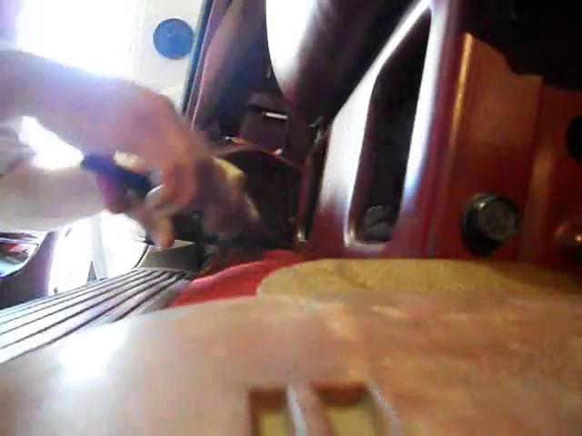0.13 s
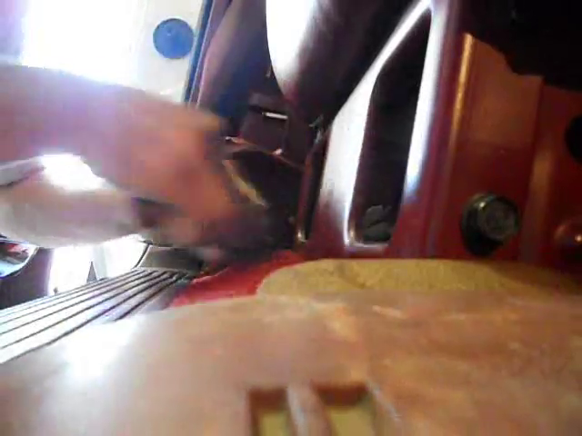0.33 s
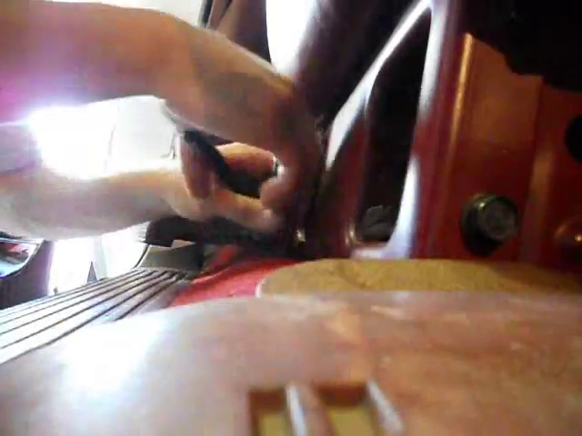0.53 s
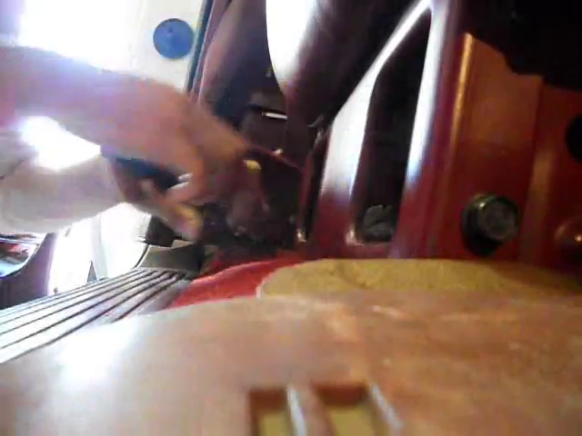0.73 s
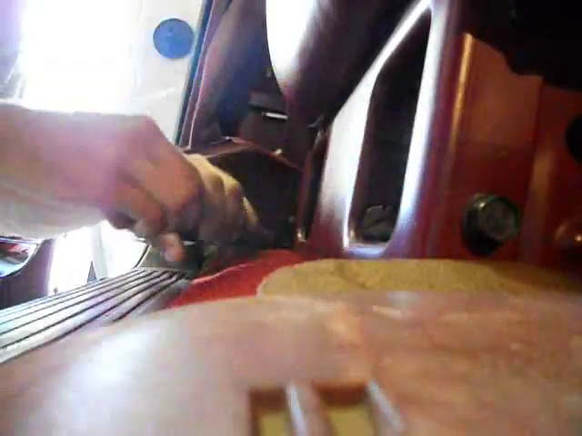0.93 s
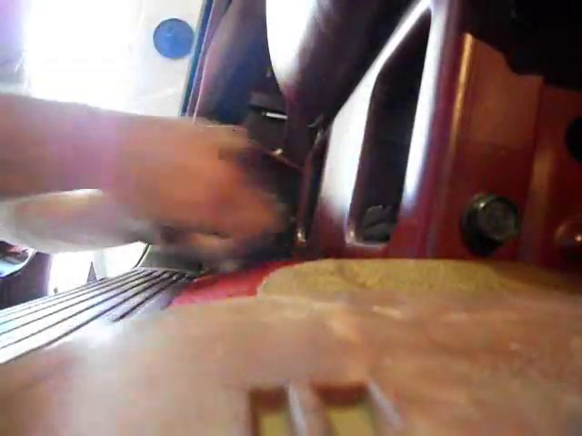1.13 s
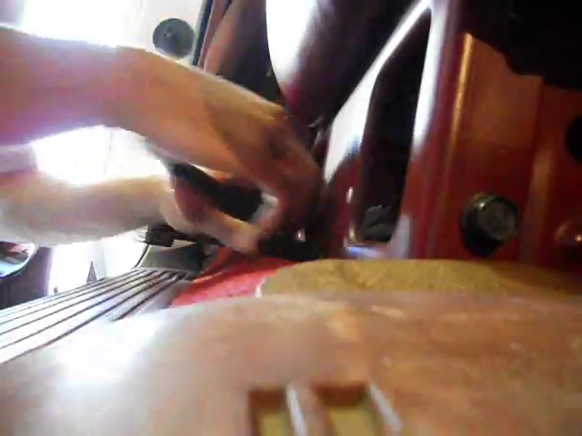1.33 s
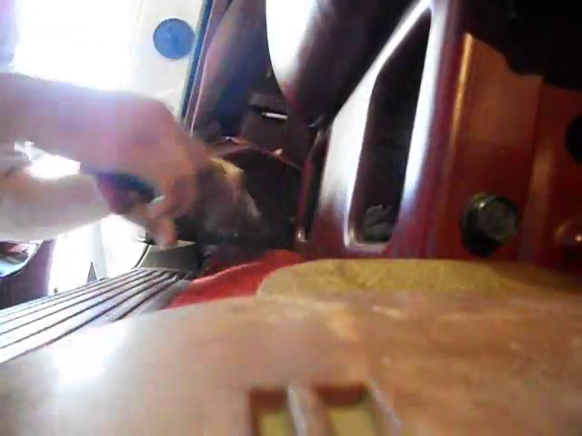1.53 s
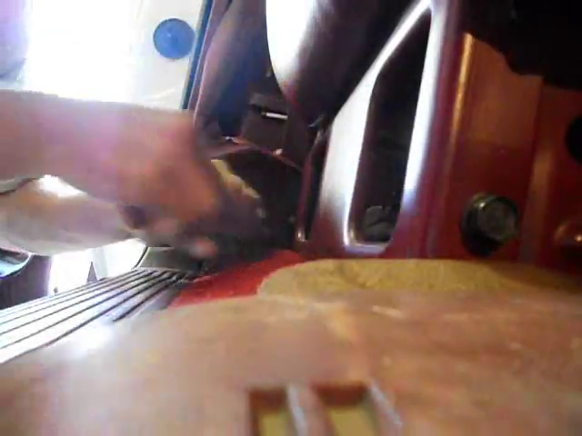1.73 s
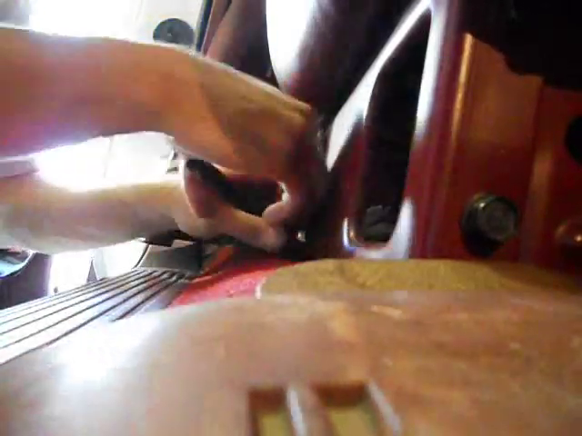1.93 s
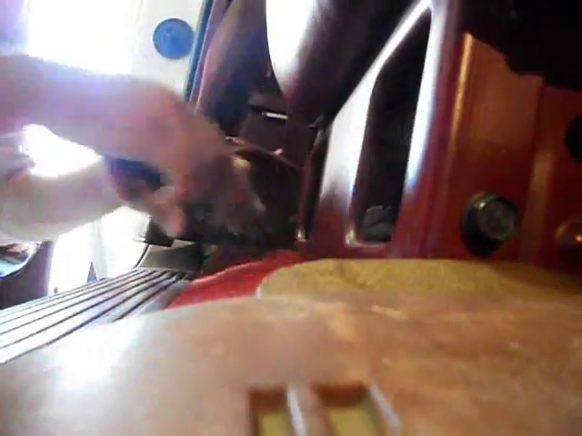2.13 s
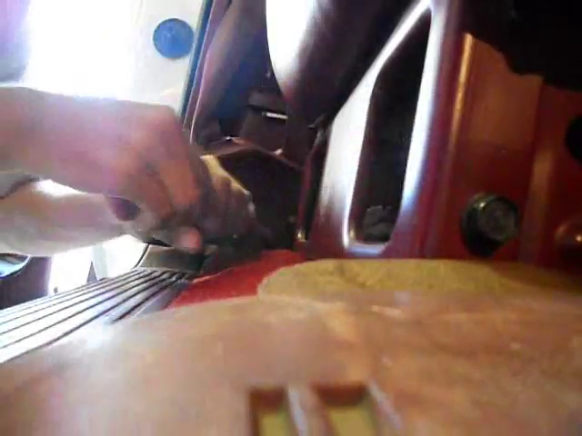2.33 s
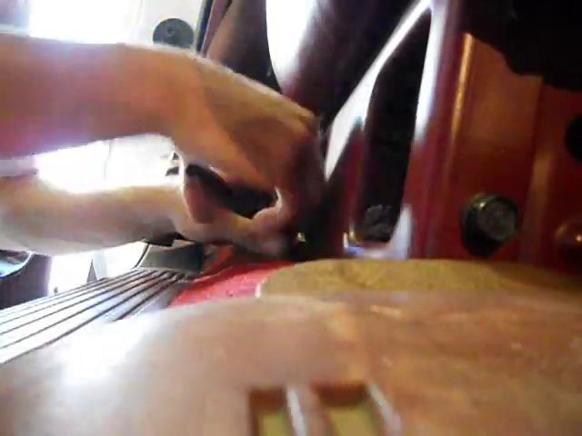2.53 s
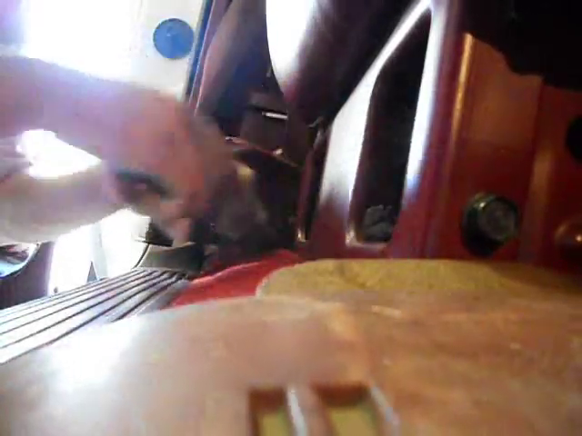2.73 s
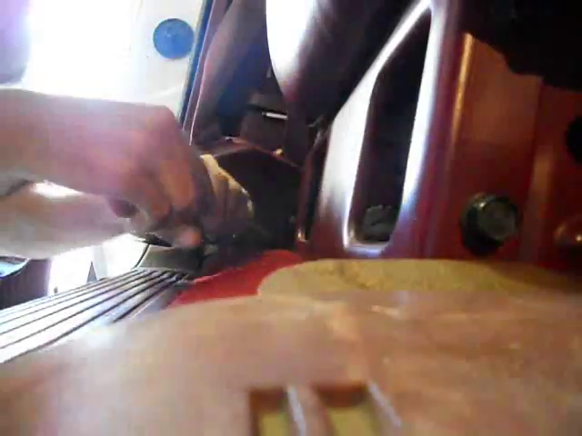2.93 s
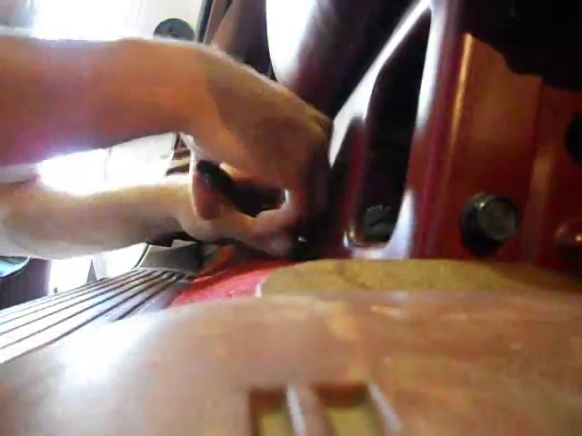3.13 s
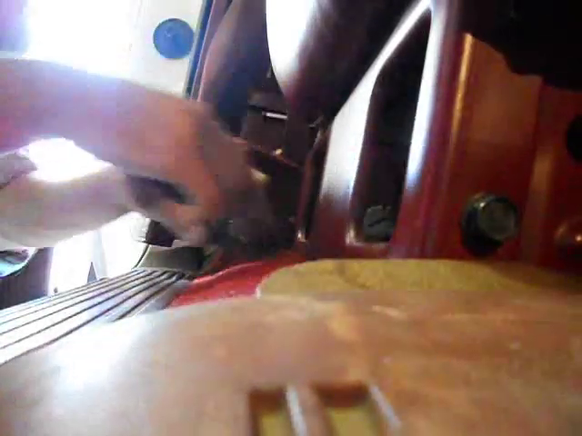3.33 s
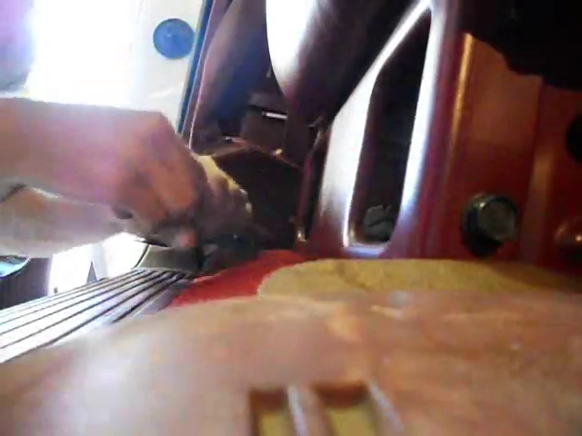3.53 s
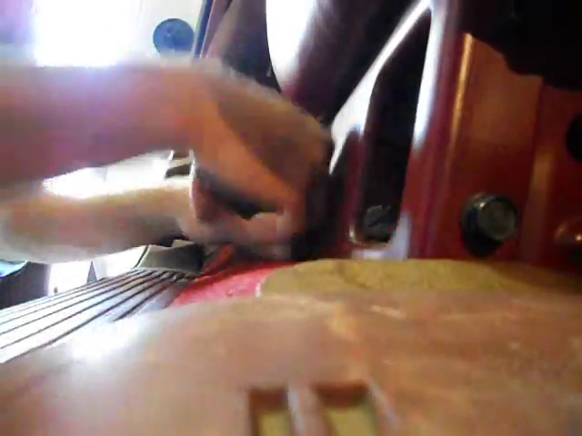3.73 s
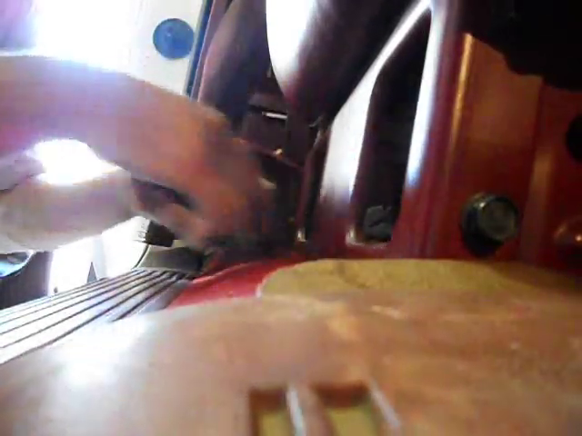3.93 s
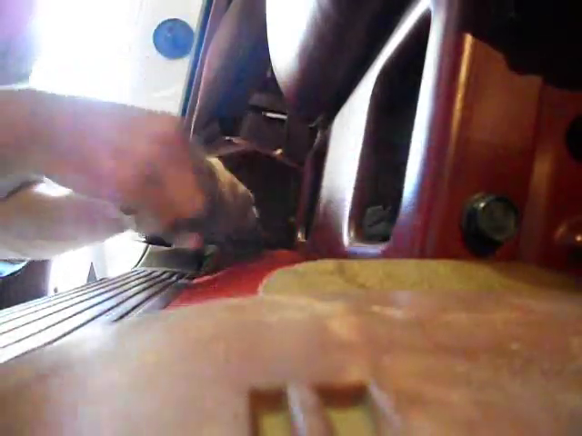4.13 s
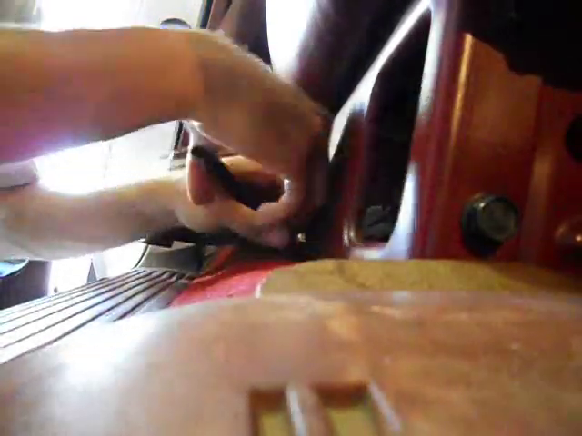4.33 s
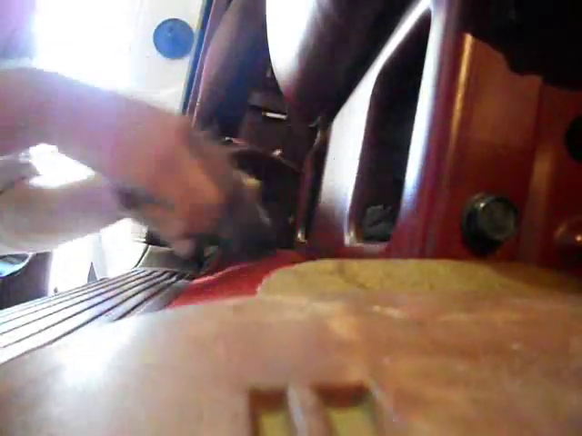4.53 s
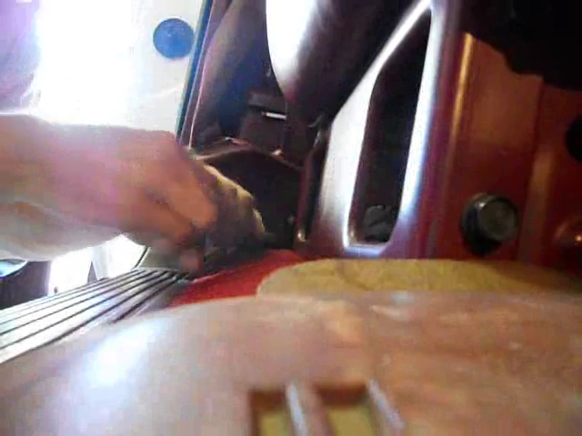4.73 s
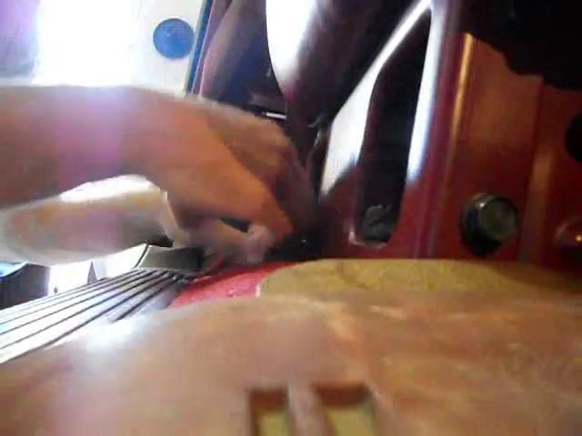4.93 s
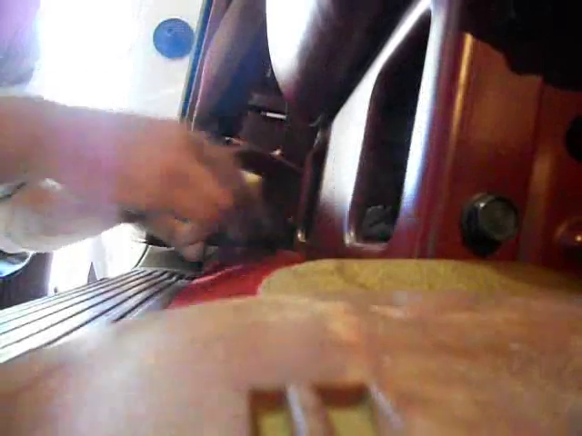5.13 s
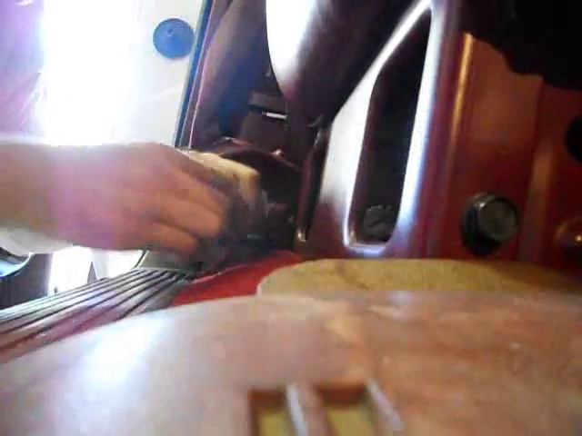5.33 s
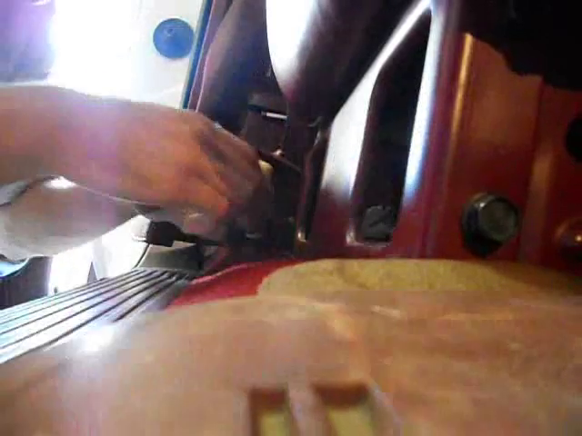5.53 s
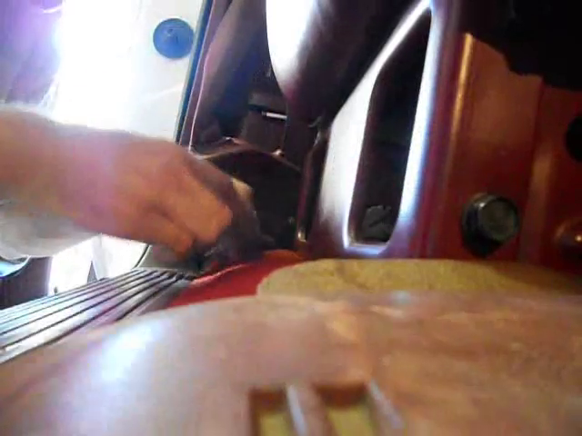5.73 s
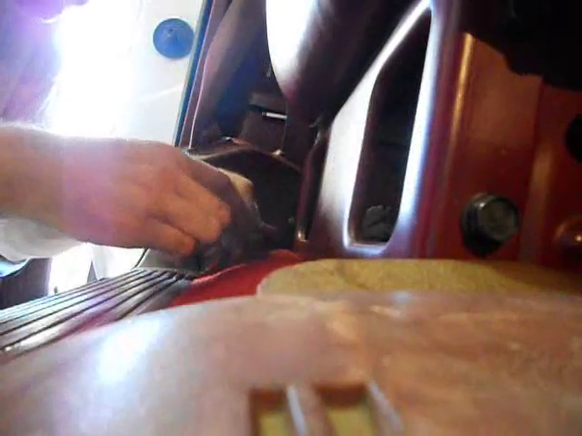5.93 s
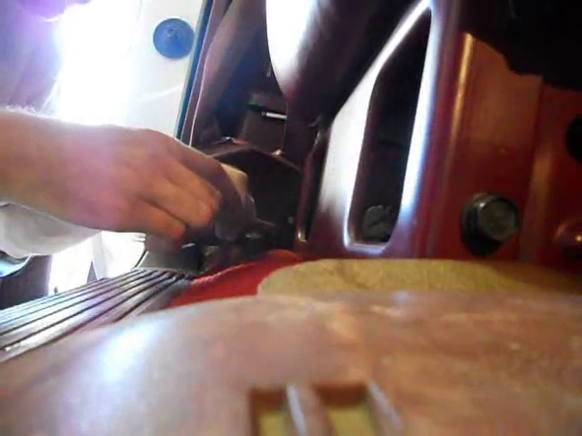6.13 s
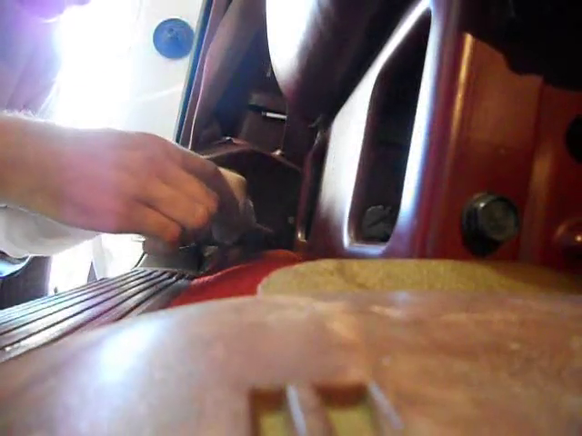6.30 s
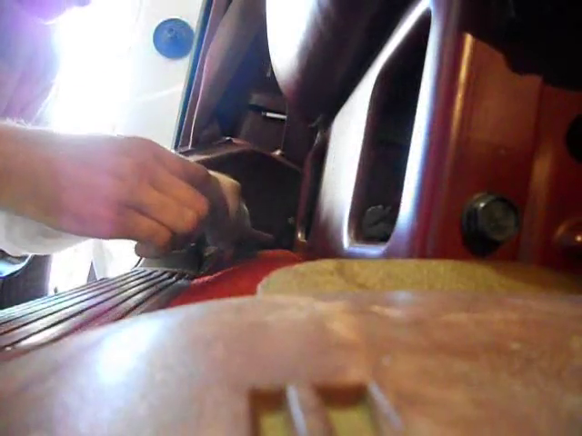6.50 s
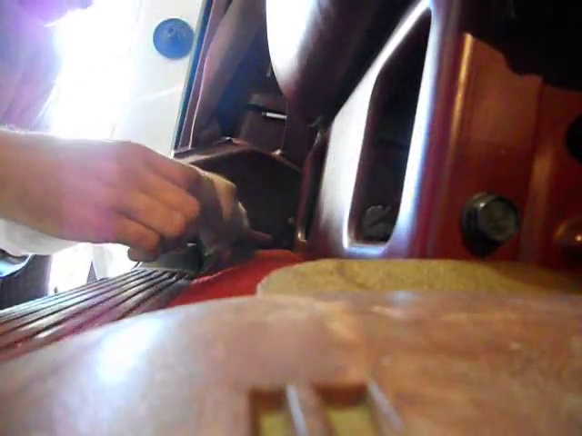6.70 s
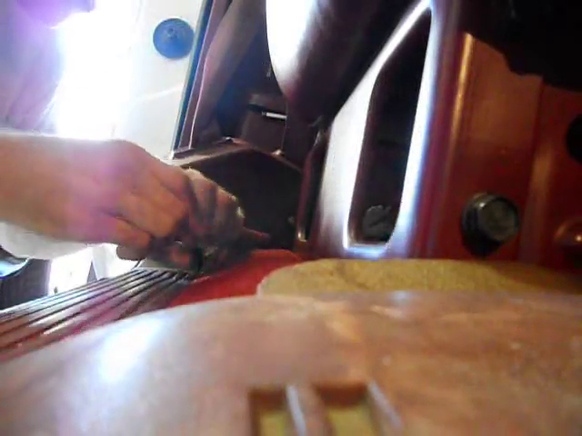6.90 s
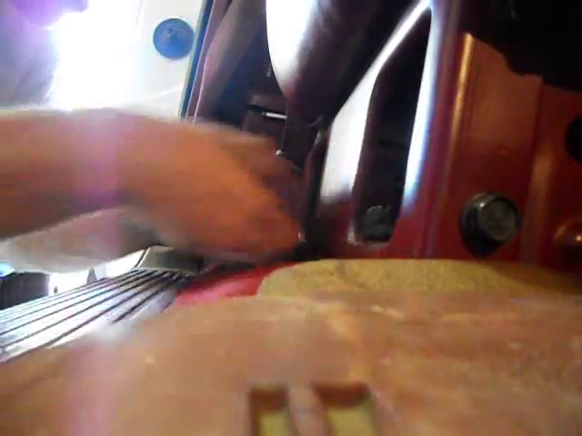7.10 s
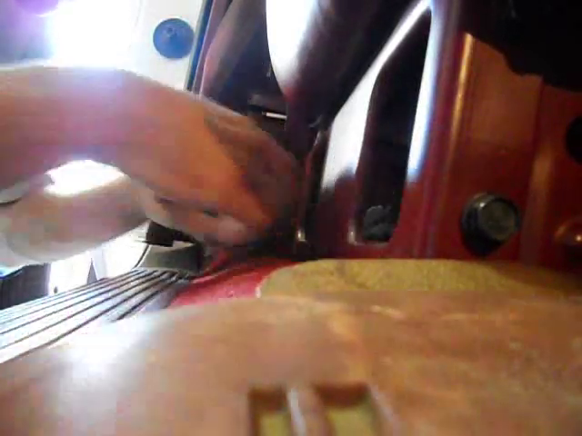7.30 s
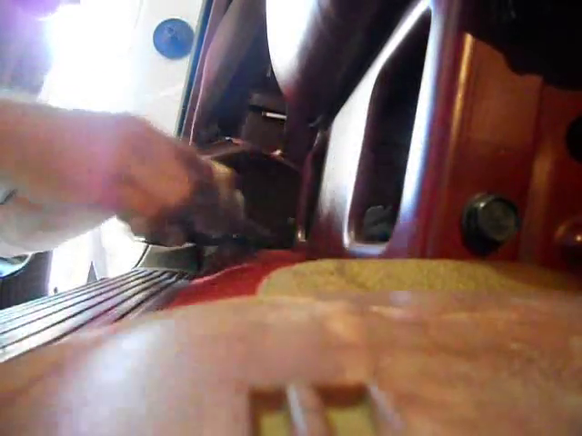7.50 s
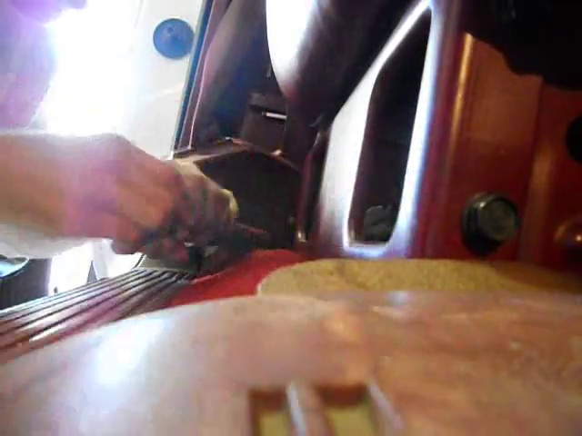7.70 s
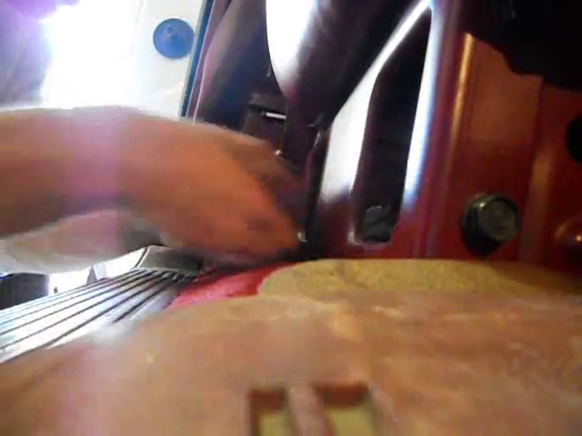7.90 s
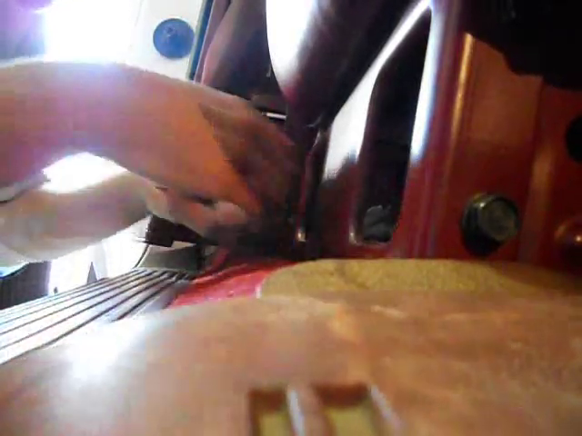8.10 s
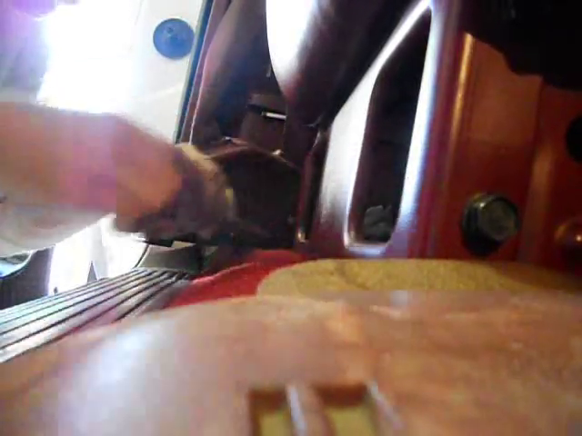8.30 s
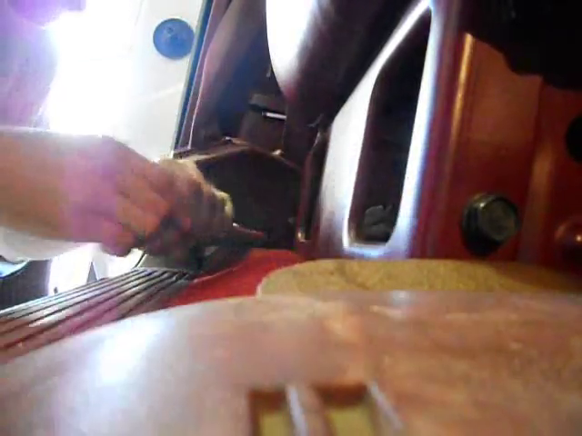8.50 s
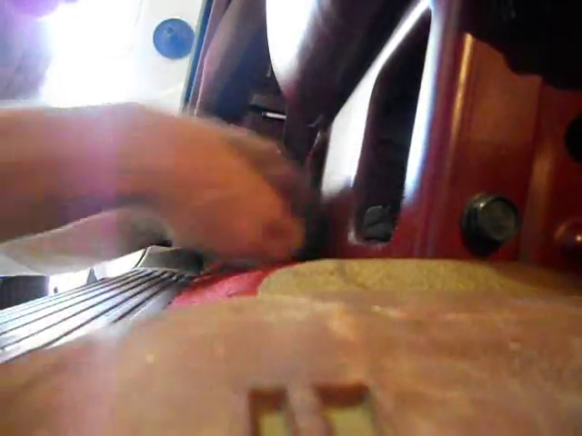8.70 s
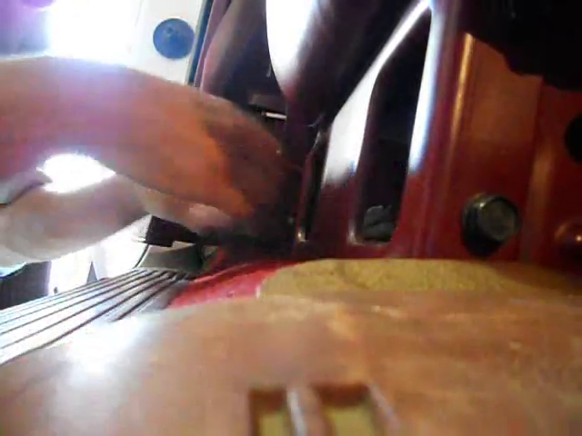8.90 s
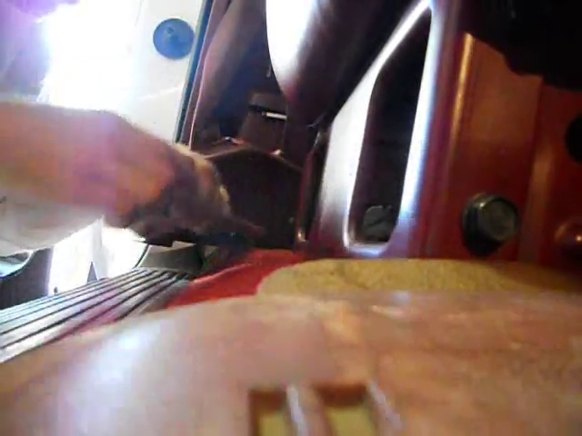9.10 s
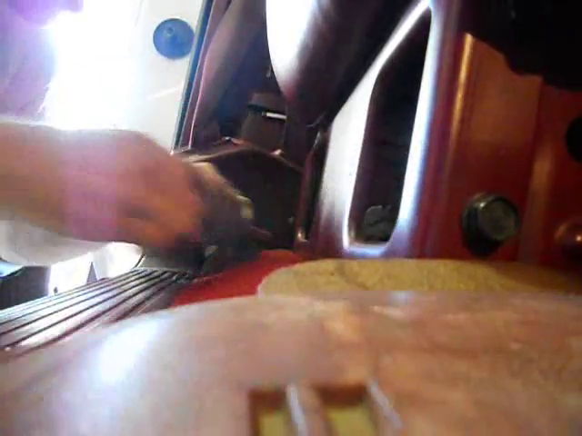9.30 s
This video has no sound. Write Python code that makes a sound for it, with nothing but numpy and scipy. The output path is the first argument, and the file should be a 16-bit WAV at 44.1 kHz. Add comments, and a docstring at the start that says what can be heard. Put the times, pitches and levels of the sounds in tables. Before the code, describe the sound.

Dry, crunchy bursts of a seized bolt turning: clustered creaky knocks, rust grit and hard steel clicks, separated by short gaps. Strokes are forceful at first, quieter and smaller around six seconds, then strong again. Brief high jaw ringing and rasping slides come in the middle, and a soft low-pitched rod tone lingers at times. Close, harsh low-grade microphone in a small cabin, with wavering hiss, faint whine and deep rumble.

```python
"""Inside a vehicle, a small camera close by: locking pliers turn a rusted bolt in short strokes, from the first moment.
In each stroke the rust grinds and the thread sticks and slips, knocking the sheet metal; the pliers clank on steel.
The jaw rings fainter at 1.4 s; a thin rod rings on at times from 1.7 s; the jaw sings in short spells from 3.4 to 4.1 s.
Scrapes come between 3.7 and 5.5 s. Under it all lie hiss, floor rumble, a thin whine and a short, dull cabin tail.
The camera samples at half rate and repeats each sample, which mirrors the treble."""
import sys
import numpy as np
from scipy import signal
from scipy.fft import rfft, irfft
from scipy.io import wavfile
from scipy.ndimage import uniform_filter1d

SR = 44100
rng = np.random.default_rng(int(sys.argv[2]) if len(sys.argv) > 2 else 0)


def wav_out(sig):
    """Save sig, one row per channel (or a flat mono array), as 16-bit PCM at SR to the path in sys.argv[1]."""
    wavfile.write(sys.argv[1], SR, np.round(np.clip(np.atleast_2d(sig).T, -1, 1) * 32767).astype(np.int16))


N = 412335  # samples


def undb(db):
    """Amplitude factor of a level in dB."""
    return 10 ** (np.asarray(db) / 20)


def unit(x):
    """Scale to an RMS of one."""
    return x / np.sqrt(np.mean(x ** 2))


def curve(table, off_db=-90):
    """Columns of a table drawn as lines over all samples; off_db outside the table's span."""
    s, *columns = np.transpose(table)
    t = np.arange(N) / SR
    return [np.interp(t, s, column, left=off_db, right=off_db) for column in columns]


def walk(rate_hz):
    """Wandering random level: held for 1 / rate_hz seconds, then slewed twice."""
    hold = int(SR / rate_hz)
    steps = np.repeat(rng.standard_normal(N // hold + 1), hold)
    return uniform_filter1d(uniform_filter1d(steps, hold), hold)[:N]


RING_T60_S, RING_SLOPE = 0.028, 0.55  # t60 at 500 Hz with damp 1, and how fast it shortens with pitch


def ring(modes, scatter_db, detune, damp=1., count=1, size=2048):
    """Responses of a set of modes; grip and contact point shift and weight them a little at every blow."""
    hz, db = np.transpose(modes)[:, :, None]
    t60_s = RING_T60_S / damp * (500 / hz) ** RING_SLOPE
    t = np.arange(size) / SR
    chance = rng.standard_normal((count, 2, len(hz), 1))
    shifted_hz = hz * (1 + detune * chance[:, 0])
    waves = np.sin(2 * np.pi * shifted_hz * t) * np.exp(-np.log(1000) * t / t60_s)
    sides = rng.choice([-1, 1], (count, len(hz), 1))  # a mode may start inward or outward
    return np.sum(undb(db + scatter_db * chance[:, 1]) * sides * waves, axis=1)


def blows(times, parts, lead_s, rise_s, last_s, shiver_db, shiver_s, grit_db, damp, scatter_db, detune,
          size=4096):
    """Each blow is a short gritty push and a faint shiver after it; parts pairs modes with a peak dB per blow."""
    t = np.arange(size) / SR
    fine = rng.standard_normal((len(times), size))
    coarse = rng.exponential(size=(len(times), size))
    grit = undb(grit_db * np.minimum(coarse, 3))
    force = grit * np.exp(-t / last_s) + undb(shiver_db) * np.exp(-t / shiver_s)
    push = fine * force * (1 - np.exp(-t / rise_s))
    out = np.zeros(N + size)
    for modes, peak_db in parts:
        responses = ring(modes, scatter_db, detune, damp, count=len(times))
        sounds = signal.fftconvolve(push, responses, axes=1)[:, :size]
        sounds *= (undb(peak_db) / np.abs(sounds).max(axis=1))[:, None]
        for start_s, sound in zip(times - lead_s, sounds):
            first = int(start_s * SR)
            out[first:first + size] += sound
    return out[:N]


# the hiss swells and sinks: time_s, level_db (before the colour and a fixed lift)
HISS_SWELL = [(0.0, -62.5), (1.69, -67.5), (2.97, -64), (3.15, -71), (3.72, -76.5), (4.17, -62.5),
              (4.63, -69.5), (6.53, -74.5), (7.06, -61.5), (8.67, -69.5), (9.35, -65)]
# colour of the hiss: pitch_hz, level_db
HISS_COLOUR = [(80, 6.5), (200, 16.5), (400, 11), (700, 8), (1200, 6), (2000, 3), (4000, 0.5), (7000, -2),
               (10500, -3)]
# low rumble through the floor: time_s, level_db
RUMBLE = [(0.0, -41.5), (1.01, -53), (1.3, -40.5), (1.51, -50), (2.91, -50), (3.67, -65), (3.77, -47),
          (4.4, -39.5), (4.69, -58), (5.6, -56), (6.28, -70.5), (7.29, -45), (8.04, -60), (8.12, -47),
          (8.59, -59), (9.35, -46.5)]
# thin whine: centre_hz, flip_hz (up and down), flip_rate_hz
WHINE = 7867, 15, 3.75


def background():
    """Coloured noise as hiss, low-band noise as rumble, and a flipping sine whine that swells with the hiss."""
    swell_db = curve(HISS_SWELL)[0]
    hz = np.fft.rfftfreq(N, 1 / SR)
    colour_hz, colour_db = np.transpose(HISS_COLOUR)
    colour = undb(np.interp(np.log(hz + 1), np.log(colour_hz), colour_db))
    hiss = irfft(rfft(rng.standard_normal(N)) * colour, N) * undb(swell_db + 18.5)

    low_band = signal.butter(2, [30, 80], "band", fs=SR, output="sos")
    rumble = unit(signal.sosfilt(low_band, rng.standard_normal(N))) * undb(curve(RUMBLE)[0])

    centre_hz, flip_hz, flip_rate_hz = WHINE
    pitch_hz = centre_hz + flip_hz * signal.square(2 * np.pi * flip_rate_hz * np.arange(N) / SR)
    whine_db = -57.0 + 1.2 * (swell_db - swell_db.mean())
    whine = undb(whine_db) * np.sin(2 * np.pi * np.cumsum(pitch_hz) / SR)
    return hiss + rumble + whine


CABIN_T60_S, CABIN_DB, CABIN_HZ = 0.15, -21.5, 1500  # decay, level of the tail, its low-pass corner


def cabin(work):
    """A short, dull tail from the cabin: the work convolved with decaying low-passed noise."""
    t = np.arange(int(.5 * SR)) / SR
    dull = signal.lfilter(*signal.butter(1, CABIN_HZ, fs=SR), rng.standard_normal(len(t)))
    tail = dull * undb(-60 * t / CABIN_T60_S)
    return undb(CABIN_DB) * signal.fftconvolve(work, tail / np.linalg.norm(tail))[:N]


# the thin rod is jolted: start_s, level_db (RMS of an undecayed tone), t60_s
ROD = [(1.66, -42.5, 0.89), (2.268, -41, 1.9), (2.872, -43, 1.9), (3.971, -43.5, 2), (4.773, -52.5, 2.1),
       (6.52, -49.5, 1.4), (6.87, -45.5, 8.7), (7.72, -43.5, 2.1), (8.419, -52, 2.1)]
ROD_HZ = 409


def rod():
    """One pure mode, set off at each jolt, swelling in over 30 ms and dying away exponentially."""
    t, out = np.arange(N) / SR, 0
    for start_s, level_db, t60_s in ROD:
        age = np.maximum(t - start_s, 0)
        level = np.sqrt(2) * undb(level_db - 60 * age / t60_s)
        out = out + level * np.minimum(age / 0.03, 1) * np.sin(2 * np.pi * ROD_HZ * age)
    return out


# jaws slide over steel, a hollow tone moving as they go (levels before the swell):
# start_s, end_s, tone_from_hz, tone_to_hz, tone_db, rasp_hz, rasp_db
SCRAPES = [(3.751, 3.787, 887, 1100, -33.5, 4440, -39), (4.103, 4.22, 1000, 1030, -66, 6630, -43),
           (5.248, 5.312, 602, 640, -26.5, 3160, -43), (5.323, 5.425, 512, 883, -27.5, 3440, -38),
           (5.416, 5.47, 877, 954, -34.5, 3520, -49), (5.453, 5.492, 893, 1010, -28.5, 3560, -35)]
# steel modes, damped fast by rust, paint and the gripping hand: pitch_hz, level_db
STEEL = [(1900, -1), (2360, 8), (2600, 0), (2990, 7), (3650, 5.5), (3960, 5), (4390, 6.5), (4800, 5),
         (5500, -3), (5950, -2.5), (6700, -3.5)]


def scrapes():
    """Rough sliding noise: a narrow gliding band and a wide rasp around a higher pitch."""
    out = np.zeros(N)
    for start_s, end_s, from_hz, to_hz, tone_db, rasp_hz, rasp_db in SCRAPES:
        size = int((end_s - start_s) * SR)
        phase = 2 * np.pi * np.cumsum(np.linspace(from_hz, to_hz, size)) / SR
        # slow noise on both quadratures makes a narrow band around the glide
        narrow = signal.lfilter(*signal.butter(3, 200, fs=SR), rng.standard_normal((2, size)))
        tone = narrow[0] * np.cos(phase) + narrow[1] * np.sin(phase)
        tone *= undb(3.3 * walk(90)[:size])

        rough = rng.standard_normal(size) * undb(4.9 * np.minimum(rng.exponential(size=size), 4))
        steel = signal.fftconvolve(rough, ring(STEEL, 1.7, 0.023)[0])[:size]
        rough = unit(rough) + undb(-7.5) * unit(steel)  # the steel rings along
        rasp_band = signal.butter(4, [.5 * rasp_hz, 1.5 * rasp_hz], "band", fs=SR, output="sos")
        rasp = signal.sosfilt(rasp_band, rough)

        swell = np.sin(np.pi * np.linspace(0, 1, size) ** 1.33) ** 0.57
        first = int(start_s * SR)
        out[first:first + size] += swell * (unit(tone) * undb(tone_db) + unit(rasp) * undb(rasp_db))
    return out


# the pliers are pulled or pushed: start_s, length_s, grinding_db, boom_db and steel_db (both against the grinding)
STROKES = [(0.0, 0.21, -32, 0, -14.5), (0.301, 0.096, -31, 2.5, -12), (0.63, 0.054, -38.5, -5, -18),
           (0.772, 0.035, -29, -9, -19), (0.893, 0.028, -43, 2, -20), (1.081, 0.21, -51, 3, -14.5),
           (1.381, 0.11, -28.5, -1, -17.5), (1.54, 0.099, -37, -2, -15.5), (1.898, 0.017, -42, -11, -27),
           (2.03, 0.16, -29.5, -0.5, -15.5), (2.652, 0.21, -29.5, -2, -17.5), (3.094, 0.052, -40.5, -3, -6),
           (3.287, 0.17, -39, -8, -16), (3.884, 0.23, -37.5, 3.5, -15), (4.227, 0.074, -32.5, -1, -21),
           (4.445, .31, -44, 0.5, -13), (5.07, 0.069, -31.5, -4.5, -19.5), (5.201, .11, -38, -5, -21),
           (5.511, 0.063, -43, -15, -11), (5.613, 0.37, -44.5, -10, -19), (6.259, 0.029, -42, -9, -22),
           (6.389, 0.044, -44, -6, -15), (6.794, .09, -43, -12, -16.5), (7.11, 0.083, -40.5, -8, -6.5),
           (7.301, 0.13, -32, 1, -19.5), (7.474, 0.12, -39, 10, -15.5), (7.687, .06, -47, 4, -6),
           (8.076, 0.043, -51, 11, -5), (8.117, 0.25, -32, -0.5, -17.5), (8.45, 0.054, -47, 3, -10),
           (8.881, 0.21, -34.5, 3.5, -15), (9.237, 0.024, -47.5, 3, -8.5)]
# body panel modes, low and higher, damped fast like the steel: pitch_hz, level_db
BOOM = [(120, -32.5), (190, 0.5), (237, 1), (280, -0.5)]
KNOCK = [(350, -8.5), (410, -4.5), (462, -2), (545, 1), (610, 0.5), (710, -7), (810, -7.5), (957, -7.5),
         (1170, -11.5), (1300, -8.5), (1560, -20.5)]
ATTACK_DB_PER_S, RELEASE_DB_PER_S = 904, 252.5  # how fast the grinding sets in and dies away


def rust():
    """Dense tiny slips of uneven size, in clumps, from six spots of the thread, while a stroke lasts."""
    t, gains = np.arange(N) / SR, 0
    for start_s, length_s, grinding_db, boom_db, steel_db in STROKES:
        before_s = np.maximum(start_s - t, 0)
        after_s = np.maximum(t - start_s - length_s, 0)
        fade_db = ATTACK_DB_PER_S * before_s + RELEASE_DB_PER_S * after_s
        gains = gains + undb(grinding_db - fade_db) * undb([[0], [boom_db], [steel_db]])
    clumps_db, parts = 4 * walk(45), 0
    spots = np.stack([ring(modes, 2, .03, count=6) for modes in (KNOCK, BOOM, STEEL)], axis=1)
    for spot in spots:
        slips = (rng.random(N) < .006) * rng.standard_normal(N)
        grains = slips * undb(2.07 * np.minimum(rng.exponential(size=N), 3) + clumps_db)
        parts = parts + signal.oaconvolve(grains[None], spot, axes=1)[:, :N]
    return sum(gain * unit(part) for gain, part in zip(gains, parts))


# pliers strike steel: start_s, peak_db, bright_db (brightest part against the peak)
CLANKS = [(0.0254, -9.5, -29), (0.0376, -8.5, -13), (0.203, -8, 1.5), (0.387, -15, -11),
          (0.6902, -5, -10.5), (0.939, -29, -15), (1.233, -29, -7), (1.5837, -31, -9),
          (1.6232, -19.5, -8.5), (1.8947, -22.5, -11), (2.071, -24.5, -5.5), (2.7344, -11.5, -15),
          (3.0814, 3.5, -9), (3.357, -29.5, -24), (3.489, -36, -27), (3.7537, -35, -5.5),
          (3.7762, -22.5, -2), (3.951, -5.5, -13.5), (4.088, -18.5, -26), (4.3167, -16.5, -10),
          (4.334, -5, 5.5), (5.085, -26, -34), (5.144, -27, -26), (5.483, -22, -16), (5.5081, -7.5, -12),
          (5.625, -27.5, -20), (5.6636, -16.5, -21), (5.7447, -14, -16), (6.101, -19.5, -24.5),
          (7.1687, -24.5, -3), (7.3127, -18.5, -24), (7.339, -17.5, -10), (7.471, -25, -30),
          (7.571, -31, -24), (7.6841, -10, -8.5), (8.1291, -9, 1.5), (8.368, -25, -26), (8.762, -36.5, -7),
          (8.907, -19, 2)]
# highest modes of the struck steel: pitch_hz, level_db
BRIGHT = [(7400, -13.5), (7900, -5.5), (8670, -13.5), (9300, -16.5), (10100, -9)]


def pliers():
    """Hard, brief contacts that reach the highest modes."""
    start_s, peak_db, bright_db = np.transpose(CLANKS)
    parts = [(STEEL, peak_db), (BRIGHT, peak_db + bright_db)]
    return blows(start_s, parts, lead_s=0, rise_s=0.00037, last_s=0.0034, shiver_db=-24.5, shiver_s=.014,
                 grit_db=-11.0, damp=2.7, scatter_db=1.5, detune=.03)


# the thread lets go: loudest_s, peak_db (of the knock), boom_db (against the knock)
SLIPS = [(0.025, -8, -19), (0.059, -2, -16), (0.099, -6.5, -7.5), (.117, -13, -15), (0.177, -13, -3),
         (.194, -11.5, -6), (.205, -12.5, -12), (.327, -17.5, 0), (.355, -21.5, 6), (.373, -13.5, 4.5),
         (.4, -8.5, 0.5), (.654, -20.5, -18), (0.69, -13.5, -8), (.636, -30, -13), (0.762, -18.5, -7),
         (0.8, -11, -19), (.818, -9.5, -26), (.845, -15.5, -6), (.941, -28, 4.5), (1.095, -21.5, 6),
         (1.242, -14.5, -7), (1.371, -25.5, 8), (1.406, -4.5, -7), (1.438, -15.5, -14), (1.453, -13, -7),
         (1.463, -9, -16), (1.485, -18, -5), (1.577, -24.5, 7.5), (1.624, -7.5, -4.5), (1.713, -23, 2),
         (1.905, -20.5, -4), (2.045, -24, -3), (2.072, -10, -7), (2.082, -8.5, -6.5), (2.099, -18.5, 2),
         (2.12, -5.5, -7), (2.172, -13.5, -6), (2.213, -9.5, -6), (2.244, -10.5, -1), (2.307, -30, 6),
         (2.682, -11, -3), (2.709, -5.5, -7), (2.738, -6, -9), (2.755, -9.5, -17), (2.774, -10.5, -6.5),
         (2.793, -8, -0.5), (2.851, -7, -5.5), (2.874, -14.5, -9), (3.086, -.5, -12), (3.271, -38, 12.5),
         (3.315, -13.5, -7), (3.375, -18, 0.5), (3.391, -23, -5), (3.415, -24, -4), (3.445, -30.5, 2),
         (3.492, -23.5, -10), (3.778, -18.5, -13), (3.928, -10, -1), (3.942, -10, -21), (3.956, -8, -18),
         (4.013, -9.5, -4.5), (4.053, -17, -2), (4.091, -11.5, 4), (4.269, -26, -2), (4.317, -6.5, -6.5),
         (4.339, -9.5, -30), (4.471, -13.5, -9), (4.5, -13, 0.5), (4.535, -14.5, -0.5), (4.575, -17, -8),
         (4.592, -15.5, -15), (4.615, -20.5, -21), (4.656, -27, 0), (4.685, -34, 14.5), (4.734, -25.5, 3),
         (4.766, -14.5, -3), (5.071, -17, -3.5), (5.145, -14.5, -0.5), (5.169, -19.5, -2),
         (5.278, -14.5, -22), (5.303, -12.5, -5), (5.368, -21.5, -32), (5.51, 2.5, -18),
         (5.627, -19.5, -16), (5.666, -10, -13), (5.701, -22, -22), (5.749, -23, -12), (5.785, -11, -41),
         (5.8, -17, -25), (5.824, -16.5, -35), (5.861, -16.5, -26), (5.881, -15, -29), (5.894, -16.5, -26),
         (5.913, -16, -11), (5.964, -23.5, -14), (6.104, -13, -17), (6.259, -38, -13), (6.274, -38, -12),
         (6.32, -34, -16), (6.374, -21.5, -24), (6.401, -27, -9), (6.42, -21.5, -12), (6.441, -26, -23),
         (6.783, -20.5, 1), (6.831, -16, -1), (6.845, -9.5, -10.5), (7.184, -26, 1.5), (7.298, -29, 10),
         (7.316, -7, -12), (7.323, -4.5, -1), (7.336, -2.5, -8), (7.387, -12.5, -1.5), (7.423, -17.5, 4),
         (7.475, -8.5, -8.5), (7.573, -14.5, -10), (7.601, -21, -20), (7.618, -14.5, 3),
         (7.683, -8.5, -1.5), (7.738, -29, 6), (8.124, -5, -0.5), (8.157, -5.5, -20), (8.193, -15, 3.5),
         (8.22, -16.5, 2.5), (8.276, -16.5, -1), (8.321, -14, -3), (8.37, -18, -17), (8.4, -9.5, -4.5),
         (8.64, -36, -12), (8.868, -38, 16), (8.907, -17, 1.5), (8.948, -11, -10), (8.959, -11.5, -10),
         (8.984, -17, 3), (9.019, -12, -17), (9.033, -13.5, -5), (9.064, -14.5, -7), (9.092, -18.5, -11),
         (9.134, -14, -2), (9.154, -6.5, -38), (9.185, -29, 12), (9.263, -27.5, -3)]
SLIP_STEEL_DB = 0.5  # a jump rings the steel this much more than the grinding of its stroke does
# strong jumps excite the upper panel modes more: level at full scale dB, dB per dB of strength
HARD_DB, HARD_PER_DB = -7, 0.7


def thread():
    """Stick-slip jumps of the bolt: a dull push into panels and steel that starts just before the loudest moment."""
    loudest_s, peak_db, boom_db = np.transpose(SLIPS)
    stroke_start_s, *_, stroke_steel_db = np.transpose(STROKES)
    stroke = np.searchsorted(stroke_start_s, loudest_s) - 1  # the latest stroke begun
    steel_db = stroke_steel_db[stroke] + SLIP_STEEL_DB + 2.5 * rng.standard_normal(len(loudest_s))
    hard_db = HARD_DB + HARD_PER_DB * peak_db
    parts = [(KNOCK, peak_db), (BOOM, peak_db + boom_db), (STEEL, peak_db + steel_db),
             (KNOCK[6:], peak_db + hard_db)]
    return blows(loudest_s, parts, lead_s=.0045, rise_s=0.00087, last_s=0.0028, shiver_db=-12.5,
                 shiver_s=0.018, grit_db=3.5, damp=1.05, scatter_db=1.5, detune=.02)


# the jaw's ringing changes, fainter in the first spell, singing out in the later three:
# start_s, end_s, level_db (4.5 dB above the gain that results)
JAW_SPELLS = [(1.402, 1.5, -6), (3.35, 3.459, 10), (3.763, 3.8, 17), (4.0, 4.103, 19)]
JAW_HZ, JAW_Q = 4390, 90


def jaw(work):
    """One hardly damped mode of the jaws, driven by all the work, with its own gain in each spell."""
    # each spell adds -1 dB while it is not on
    spells_db = sum(curve([(start_s, level_db), (end_s, level_db)], off_db=-1)[0]
                    for start_s, end_s, level_db in JAW_SPELLS)
    return signal.lfilter(*signal.iirpeak(JAW_HZ, JAW_Q, fs=SR), undb(-1.5 + spells_db) * work)


LOW_CUT_HZ = 144


def scene():
    """The work on the bolt with its cabin tail, over the ringing rod and the background."""
    work = thread() + pliers() + rust() + scrapes()
    work = work + jaw(work)
    # the deep bass is cut away
    work = signal.sosfilt(signal.butter(3, LOW_CUT_HZ, "high", fs=SR, output="sos"), work)
    return (work + cabin(work) + rod() + background())[None]


HALF_RATE_HZ, TOP_HZ = 10280, 15800  # low-pass corners before halving the rate and after repeating


def record(dry):
    """The camera clips, samples at half rate, repeats every sample (mirroring the treble) and cuts the top."""
    half_filter = signal.ellip(6, .3, 50, HALF_RATE_HZ, fs=SR, output="sos")
    limited = signal.sosfilt(half_filter, np.clip(dry, -1, 1))
    held = np.repeat(limited[:, ::2], 2, axis=1)[:, :N]
    return signal.sosfilt(signal.ellip(10, .2, 70, TOP_HZ, fs=SR, output="sos"), held)


dry = scene()
out = record(dry)
wav_out(out)
```